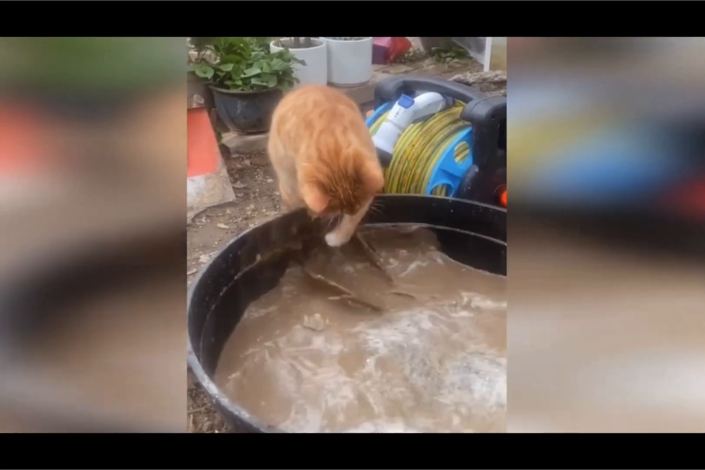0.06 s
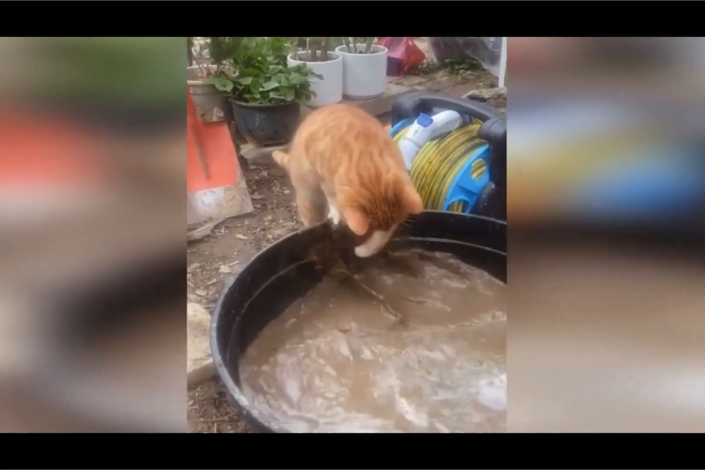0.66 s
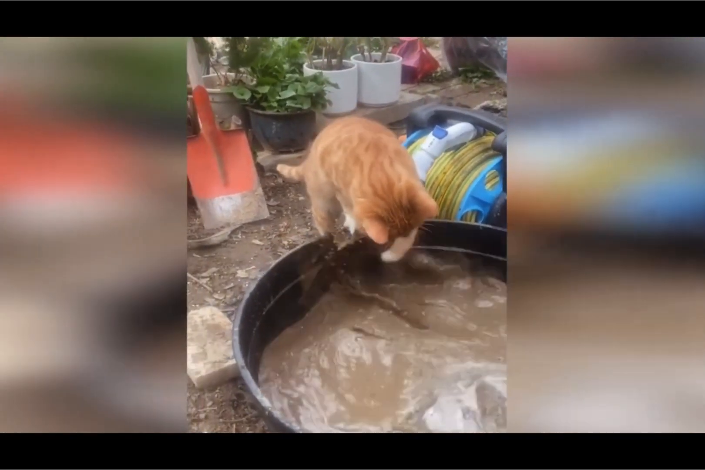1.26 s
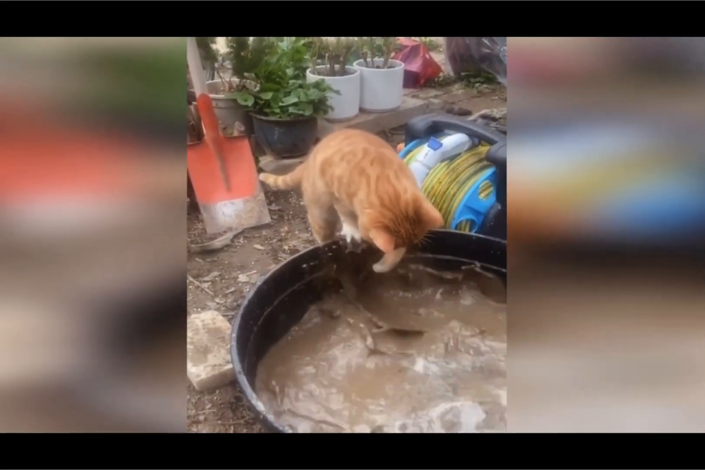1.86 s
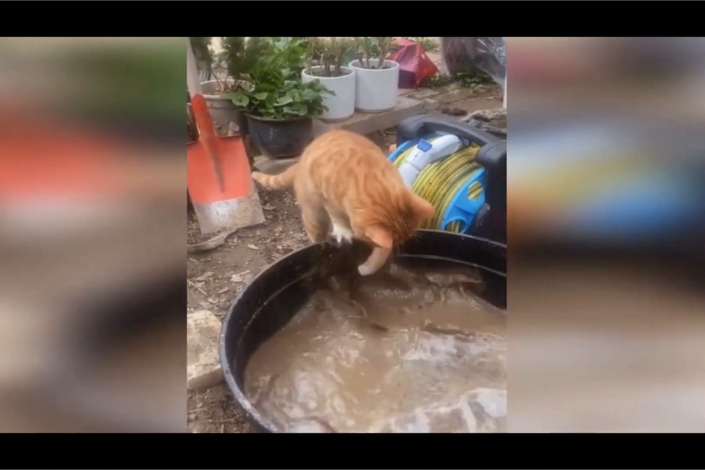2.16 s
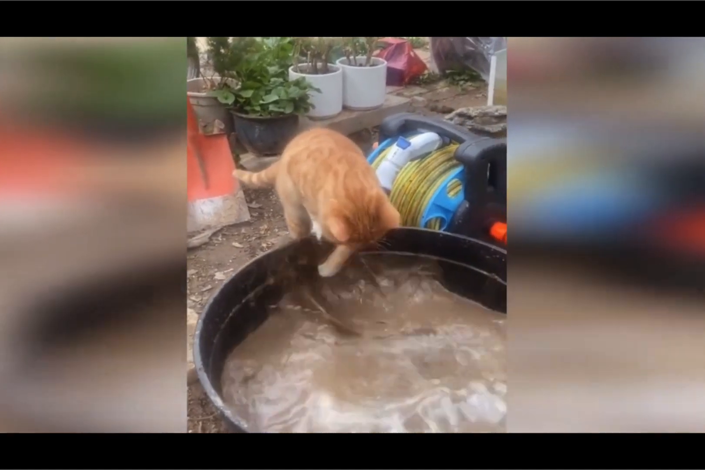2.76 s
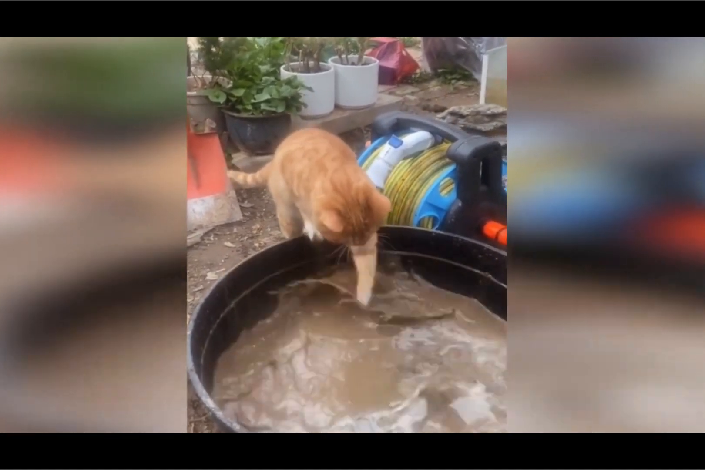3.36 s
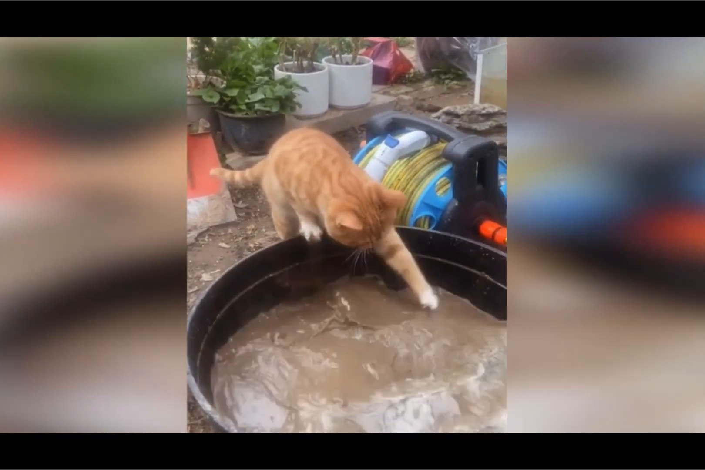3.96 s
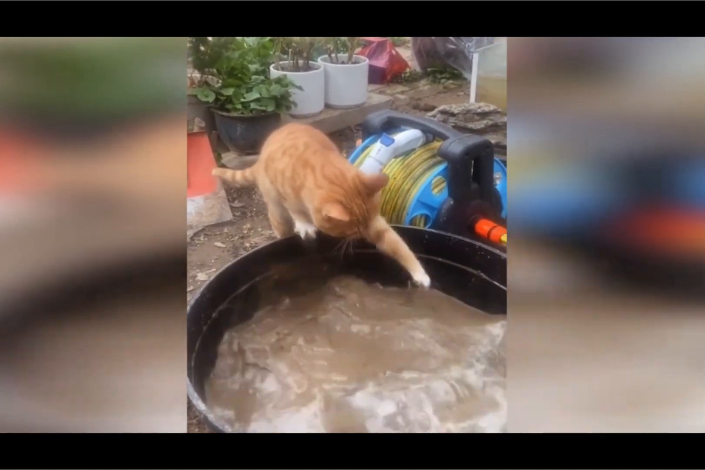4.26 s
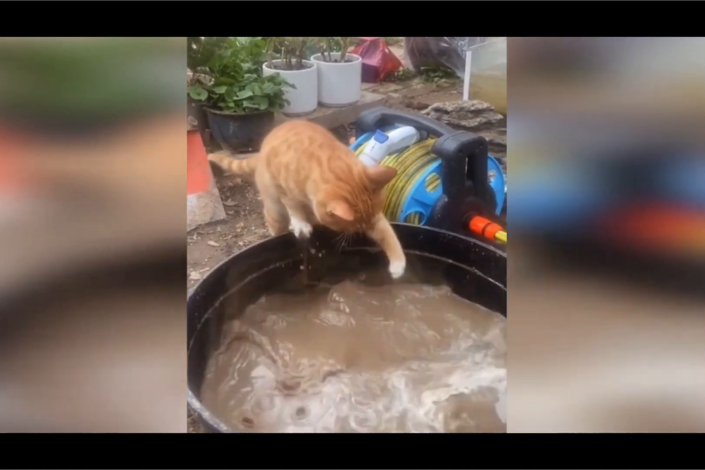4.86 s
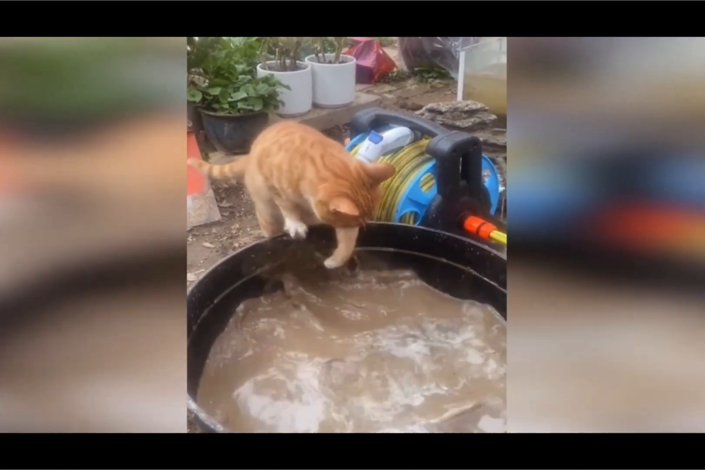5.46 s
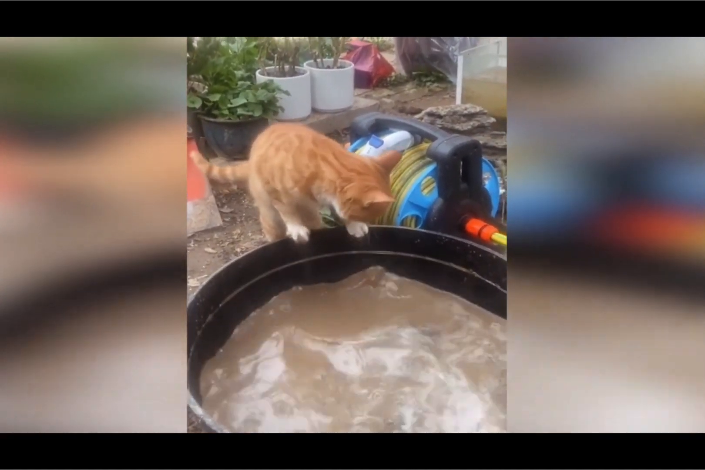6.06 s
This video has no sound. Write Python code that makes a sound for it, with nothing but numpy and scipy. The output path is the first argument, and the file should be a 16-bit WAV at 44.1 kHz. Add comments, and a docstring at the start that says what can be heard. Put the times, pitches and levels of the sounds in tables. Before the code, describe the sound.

A cat paws at water in a plastic tub outdoors, close to a stereo microphone. From the start until about 3.2 seconds the strokes come roughly three a second, uneven in strength, with sharp ones near 0.3 and 2.7 seconds. Each is a soft swish swelling into a short splash, closed by a plop and a hollow gulp. Between them drops tick back and small bubbles plink. Lighter dips and drips follow until about 4 seconds, then fuller splashes return at 4.3, 4.6 and 5 seconds. The tub gives soft low thuds near 3.7, 4.3 and 4.9 seconds, the last the strongest. After a light splash at 5.3 seconds the water settles until the end at 6 seconds. A quiet low rumble and faint open-air hiss run throughout, with barely audible soft distant tones around 1.3 and 4.5 to 4.8 seconds.

```python
"""A cat paws at the water in a plastic tub, about three strokes a second, close to a stereo microphone.
The paw dips in with a soft swish, then pulls through: churn and spray swell, the hollow behind it
closes with a plop and the tub gulps. Between strokes drops tick back and bubbles plink.
The tub gives a few soft low thuds. It stands outdoors, in a low rumble and faint hiss,
with a few soft tones far away."""
import sys
import numpy as np
from scipy import signal
from scipy.fft import rfft, irfft, next_fast_len
from scipy.io import wavfile
from scipy.ndimage import map_coordinates

SR = 44100
rng = np.random.default_rng(int(sys.argv[2]) if len(sys.argv) > 2 else 0)


def bounce(signal):
    """Save signal as a 16-bit WAV file at the path given by the first command-line argument."""
    frames = np.transpose(np.atleast_2d(signal))
    limited = np.clip(frames, -1, 1)
    pcm = np.round(limited * 32767).astype(np.int16)
    wavfile.write(sys.argv[1], SR, pcm)


N = 269054

# paw strokes, timed where the hollow closes; a rise spans 60 dB:
# close_s, churn_db, spray_db, rise_s, pocket_hz, pocket_db, pocket_t60_s, gulp_db
PAW_STROKES = [(.2575, -32.3, -35.5, .075, 1570, -21, 0.012, -29.5),
               (.557, -39, -38.5, .067, 1500, -32, 0.043, -30),
               (.830, -36, -40.5, 0.08, 1600, -19, 0.0042, -27),
               (1.131, -35.5, -38, 0.12, 1880, -24.5, 0.0045, -27),
               (1.445, -36.5, -38, 0.1544, 1310, -26, .008, -36.5),
               (1.761, -42, -46, 0.17, 1294, -33.5, .008, -38),
               (2.072, -42, -46.5, 0.19, 1390, -29.5, 0.032, -35),
               (2.382, -39.5, -42.5, 0.1, 1776, -22.5, 0.0099, -43),
               (2.678, -34, -35.7, .03, 1295, -27.5, .035, -32),
               (3.011, -38, -39, 0.11, 1390, -19, 0.01, -31.5),
               (3.227, -46, -52, 0.2, 1608, -35, .012, -47),
               (4.040, -47.5, -47.5, 0.09, 1330, -46, .02, -48),
               (4.348, -41.5, -47, 0.14, 2060, -38, .022, -32.5),
               (4.640, -35.5, -38.5, .11, 1474, -25.5, .022, -34.5),
               (4.983, -40.5, -42.5, .11, 2330, -24.5, 0.0024, -38.5),
               (5.337, -47, -45.5, .11, 1386, -48, .02, -53)]
# light dips and lifts of the paw; a fall spans 60 dB: peak_s, churn_db, spray_db, fall_s
PAW_DIPS = [(.178, -49.5, -50, 0.45), (0.485, -51.5, -48, 0.27), (.772, -60, -49.5, 0.4),
            (1.067, -56, -49, 0.03), (1.37, -53, -49, 0.22), (1.558, -52.5, -54.5, 0.18),
            (1.643, -55.5, -55, 0.48), (1.711, -51.5, -49.5, 0.42), (2.005, -62, -49.5, 0.06),
            (2.317, -53, -50, 0.14), (2.351, -53.5, -51.5, 0.38), (2.615, -51, -44.5, .16),
            (2.656, -50, -45.5, .27), (2.915, -49, -46.5, 0.18), (3.113, -59, -55, 0.3),
            (3.246, -47.5, -46, 0.06), (3.33, -59.5, -54.5, 0.22), (3.391, -55, -55.5, 0.18),
            (3.59, -53.5, -50, 0.1), (3.652, -56, -51.5, .23), (3.721, -51, -55.5, 0.13),
            (3.905, -51.5, -50.5, .27), (3.985, -56, -48.5, 0.3), (4.151, -51, -51.5, .05),
            (4.273, -53.5, -47.5, 0.08), (4.314, -48, -43, 0.13), (4.548, -61.5, -50.5, 0.52),
            (4.872, -49, -54.5, 0.12), (4.914, -51, -44, 0.08), (5.272, -65, -57, 0.2),
            (5.361, -52, -54, 0.2)]
# restless water between strokes, settling at the end: time_s, churn_db, spray_db
RESTLESS_WATER = [(0, -62, -62.5), (.25, -80, -75), (.5, -67.5, -64), (1.0, -71, -69), (1.5, -69.5, -70),
                  (2.0, -68, -63), (2.3, -70, -72.5), (2.75, -73.5, -70), (3.5, -67.5, -64.5),
                  (3.75, -71, -63), (4.0, -83, -78), (4.25, -64, -64.5), (4.5, -72, -72),
                  (5.0, -70.5, -64.5), (5.25, -84, -76.5), (5.5, -73.5, -74), (5.75, -88, -83),
                  (6.03, -79, -90)]
# notes of the tub's gulp under every stroke: pitch_hz, relative_db, t60_s
GULP_NOTES = [(335, -18, .035), (512, -14, 0.024), (724, -1.5, 0.027), (1060, -9.5, 0.025)]
# the clearest single bubbles: start_s, pitch_hz, relative_db, t60_s
CLEAR_BUBBLES = [(.042, 3890, -35.5, .019), (.09, 4120, -42, .018), (.171, 706, -38.5, .017),
                 (.186, 2820, -41, .023), (.262, 1060, -28, .019), (.403, 2138, -54, .033),
                 (.471, 640, -38, 0.016), (.671, 2253, -50.5, .033), (.7, 2189, -49, .02),
                 (.712, 2130, -44, 0.015), (.769, 2960, -41.5, .022), (.984, 4070, -48, 0.023),
                 (1.139, 2280, -29.5, .028), (1.436, 1890, -32, .005), (1.643, 1236, -33.5, 0.034),
                 (1.713, 3000, -36, .003), (1.755, 1750, -33, 0.02), (1.871, 3630, -41.5, .009),
                 (1.998, 3400, -40.5, .025), (2.005, 2850, -35, 0.015), (2.125, 980, -50.5, 0.045),
                 (2.445, 1960, -40, 0.034), (2.679, 2950, -23.5, 0.018), (2.6804, 2020, -27, .022),
                 (2.959, 1207, -42, .037), (3.110, 3030, -33, 0.027), (3.141, 2065, -45, 0.016),
                 (3.2205, 667, -35.5, 0.013), (3.221, 1090, -40.5, 0.017), (3.229, 2180, -34, 0.031),
                 (3.319, 825, -46, 0.033), (3.392, 730, -43.5, 0.014), (3.553, 650, -37.5, 0.023),
                 (3.703, 1798, -43, .039), (3.722, 1470, -40, 0.024), (3.775, 290, -53.5, .045),
                 (3.895, 715, -46, .026), (3.925, 3420, -35.5, .023), (4.031, 1350, -35, 0.019),
                 (4.151, 1510, -40.5, 0.042), (4.224, 677, -47, .029), (4.204, 1820, -30, 0.013),
                 (4.274, 2240, -38, .029), (4.974, 3660, -33, 0.017), (5.325, 1386, -44, 0.02),
                 (5.361, 2060, -29, .0055), (5.465, 2870, -60.5, .014)]
# the clearest drops hitting the surface: start_s, relative_db, brightness_hz
CLEAR_DROPS = [(.089, -48, 5900), (.461, -50, 6300), (.905, -55, 7100), (1.069, -42.5, 6300),
               (1.239, -47, 5560), (1.373, -44, 6700), (2.080, -41.5, 5950), (2.314, -40.5, 5000),
               (2.583, -46, 4600), (2.614, -36.5, 5600), (2.906, -39.5, 5560), (2.918, -38, 5750),
               (2.964, -44, 8300), (3.319, -45, 5000), (3.393, -46.5, 6200), (3.455, -39, 5460),
               (3.723, -46, 6300), (3.876, -53.5, 6900), (4.204, -41.5, 4100), (4.3495, -38.5, 5750),
               (4.756, -46, 6900), (4.881, -36.5, 5400), (5.264, -45.5, 6240), (5.3414, -39.5, 10500),
               (5.55, -58, 6700)]
# colours of the churn, the spray and a closing air pocket: frequency_hz, relative_db
CHURN_SPECTRUM = [(150, -33.5), (250, -18.5), (335, 2), (450, -4.5), (560, 0), (730, 1), (1000, -6),
                  (1500, -3), (2300, -2.5), (3100, -2), (4000, -5.5), (4800, -14.5), (6500, -29.5)]
SPRAY_SPECTRUM = [(2200, -18), (3700, -2.5), (4700, -6.5), (5400, 1), (6800, -2), (8300, -4.5), (12000, -4),
                  (14500, -7.5), (16000, -15.5)]
SMACK_SPECTRUM = [(150, -30.5), (250, -12), (340, 6), (480, 0.5), (800, 0), (2000, -2.5), (3500, -9),
                  (6000, -16.5), (12000, -30)]
# ring of the tub and yard: frequency_hz, t60_s
TUB_DECAY = [(300, 0.08), (800, 0.049), (2000, 0.09), (6000, 0.037), (14000, 0.031)]
# how alike the splashing is left and right: frequency_hz, likeness (1 or more is mono)
WATER_LIKENESS = [(300, 1.5), (700, 0.4), (1200, 1.03), (2500, 0.42), (4500, -.05), (9000, 0), (14000, .35)]
# the water's balance at the microphone: frequency_hz, left_minus_right_db
WATER_BALANCE = [(60, 0.0), (110, 0.5), (200, -2), (380, 2.5), (700, 5), (1290, 1.5), (2380, 1.5),
                 (4400, -0.5), (8120, 0.0), (15000, 0.0)]
# soft low thuds of the tub: peak_s, upper_gain_db
TUB_THUDS = [(3.71, 4), (4.31, 6), (4.885, 16), (4.985, 8)]
# outdoor rumble in two bands: time_s, deep_db, upper_db
RUMBLE_LEVELS = [(0, -58, -61.5), (2.9, -59.5, -63), (4.3, -58.5, -60), (5.0, -58.5, -61.5),
                 (5.45, -67.5, -66), (5.8, -60.5, -68.5), (6.1, -60, -64.5)]
# colours of the two low bands and the open-air hiss: frequency_hz, relative_db
DEEP_SPECTRUM = [(20, -28), (33, -18), (46, -2.5), (58, 1.5), (80, -3), (110, -14), (200, -49)]
UPPER_SPECTRUM = [(60, -19), (95, 0), (125, 1), (170, -8.5), (260, -13), (400, -23), (800, -44)]
AIR_SPECTRUM = [(150, -6), (350, -0.5), (750, 2.5), (1100, -8), (2700, -19.5), (5000, -31), (8000, -33.5),
                (12000, -29.5), (16000, -33)]
# faint tones in the distance: middle_s, length_s, pitch_hz, level_db
DISTANT_TONES = [(1.25, .24, 601, -66.5), (1.377, 0.13, 632, -64), (4.509, 0.11, 394, -63.5),
                 (4.77, 0.27, 410, -70)]


def splashing(calm_db=-54, froth_db=-.5, beads_db=-10, spray_db=-.33, crackle_db=-10):
    """The paw tears the water unevenly into coarse churn and fine spray: tiny bubbles and noise."""
    power = paw_power()
    tearing = amp(.53 * wobble(110) + .7 * wobble(40))
    churn_gain, spray_gain = np.sqrt(power) * tearing
    froth = bubble_cloud(596.4, 4840, cycles=15, spread_db=4, glide=.067, count=6000, samples=500)
    beads = bubble_cloud(1406, 4790, cycles=95, spread_db=5, glide=.12, count=220, samples=1300)
    fizz = bubble_cloud(2996, 14480, cycles=30, spread_db=5, glide=.064, count=4500, samples=400)
    # in calm water single bubbles stand out; in a hard stroke they merge into froth
    calm = 1 / np.hypot(1, churn_gain / amp(calm_db))
    churn = amp(froth_db) * stereo(froth + 1.17 * rng.standard_normal((2, N)), CHURN_SPECTRUM)
    churn += amp(beads_db) * calm * stereo(beads, CHURN_SPECTRUM)
    spray = amp(spray_db) * stereo(fizz + 1.4 * rng.standard_normal((2, N)), SPRAY_SPECTRUM)
    # light splashes break up into separate crackling droplets
    crackle = bubble_cloud(2800, 8500, cycles=24, spread_db=6, glide=.1, count=520, samples=400)
    spray += amp(crackle_db) * calm * stereo(crackle, SPRAY_SPECTRUM)
    return churn_gain * churn + spray_gain * spray


def paw_power(crest_s=.0056, collapse_s=.082, dip_rise_s=.11, pre_hit_db=-2.5, lead_s=.0041, hard_db=-44):
    """Each stroke and dip swells and collapses over the restless water: power of churn and of spray."""
    t = np.arange(N) / SR
    power = amp(curves(RESTLESS_WATER)) ** 2
    moves = [(s + crest_s, churn, spray, rise, collapse_s) for s, churn, spray, rise, *_ in PAW_STROKES]
    moves += [(s, churn, spray, dip_rise_s, fall) for s, churn, spray, fall in PAW_DIPS]
    for peak_s, churn_db, spray_db, rise_s, fall_s in moves:
        near = slice(max(int((peak_s - .3) * SR), 0), int((peak_s + .4) * SR))
        swell_db = -60 * np.maximum((peak_s - t[near]) / rise_s, (t[near] - peak_s) / fall_s)
        # a short hiss fades in before each hard splash; the body comes at the hit
        held_db = pre_hit_db * (t[near] < peak_s - lead_s) / np.hypot(1, amp(hard_db - churn_db))
        power[:, near] += amp([churn_db + swell_db + held_db, spray_db + swell_db]) ** 2
    return power


def bubble_cloud(low_hz, high_hz, cycles, spread_db, glide, count, samples):
    """Tiny bubbles ring and rise in pitch, each from its own direction: middle and side of rms 1."""
    when, pitch, strength, angle = rng.random((count, 4)).T[..., None]
    hz = low_hz * (min(high_hz, SR / 2) / low_hz) ** pitch
    turns = hz * np.arange(samples) / SR
    gain = amp(-spread_db * np.log(1 - .95 * strength)) * hz
    envelope = amp(-60 * turns / cycles) * (1 - np.exp(-turns / 2))
    ring = gain * envelope * np.sin(2 * np.pi * turns * (1 + glide * turns / cycles / 2))
    at = ((when * N).astype(int) + np.arange(samples)).ravel()
    mid_side = (1, np.cos(2 * np.pi * angle))
    return np.array([unit(np.bincount(at, (ring * pickup).ravel(), N)[:N]) for pickup in mid_side])


def bubbles(glide=.16, ring_db=-.5, smack_db=-6.5, smack_t60_s=.023, big_db=-32):
    """Trapped air rings at the pitch of its size and rises; big pockets close with a broad smack."""
    out, t = np.zeros((2, N)), np.arange(SR // 20) / SR
    for start_s, hz, db, t60 in [*pockets_and_gulps(), *CLEAR_BUBBLES, *stray_bubbles()]:
        turns = hz * t * (1 + glide * (t / t60 / 2 - .15))
        envelope = (1 - np.exp(-(hz * t) ** 2)) * amp(-60 * t / t60)
        ring = amp(ring_db) * envelope / envelope.max() * np.sin(2 * np.pi * turns)
        bulk = np.sqrt(min(t60 / smack_t60_s, 1)) / np.hypot(1, amp(big_db - db))  # loud, long: much air
        # small pockets give no low thud
        colour = lambda f: amp(along(SMACK_SPECTRUM, f)) * f ** 2 / (f ** 2 + (.29 * hz) ** 2)
        smack = unit(filtered(rng.standard_normal(len(t)), colour))
        smack *= bulk * amp(smack_db - 60 * t / smack_t60_s) * (1 - np.exp(-t / .00026))
        add(out, start_s, amp(db) * in_tub(ring + smack, wall_db=-15, apart_hz=1000))
    return out


def pockets_and_gulps(scatter=.05):
    """Every stroke traps a pocket of air and makes the tub gulp: rows like CLEAR_BUBBLES."""
    rows = []
    for close_s, *_, pocket_hz, pocket_db, pocket_t60_s, gulp_db in PAW_STROKES:
        tuning = 1 + scatter * rng.uniform(-.8, 1)
        rows.append((close_s, pocket_hz, pocket_db, pocket_t60_s))
        rows += [(close_s, hz * tuning, gulp_db + db, t60) for hz, db, t60 in GULP_NOTES]
    return rows


def stray_bubbles(play_s=4.7, low_hz=1800, faint_db=-59, range_db=8, t60_s=.026, count=24):
    """Small bubbles plink at random, within an octave, while the cat plays: rows like CLEAR_BUBBLES."""
    return [(play_s * (k + when) / count, low_hz * 2 ** pitch, faint_db + range_db * strength, t60_s)
            for k, (when, pitch, strength) in enumerate(rng.random((count, 3)))]


def drops(t60_s=.016, attack_s=.0011, width_octaves=.52, gain_db=9):
    """A falling drop gives a short bright tick, somewhere across the tub."""
    out, t = np.zeros((2, N)), np.arange(SR // 50) / SR
    for start_s, db, brightness_hz in [*CLEAR_DROPS, *stray_drops()]:
        band = lambda hz: 1 / (1 + (np.log2((hz + 1) / brightness_hz) / width_octaves) ** 2)
        tick = unit(filtered(rng.standard_normal(len(t)), band))
        tick *= amp(-60 * t / t60_s) * (1 - np.exp(-t / attack_s))
        pan = amp(rng.normal(0, 1.4) * np.array([[1], [-1]]))
        add(out, start_s, amp(db + gain_db) * pan * in_tub(tick, wall_db=-8.5, apart_hz=1200))
    return out


def stray_drops(play_s=4.7, centre_hz=6600, faint_db=-60, range_db=8, octaves=.8, count=20):
    """Thrown water falls back at random while the cat plays: rows like CLEAR_DROPS."""
    return [(play_s * (k + when) / count, faint_db + range_db * strength,
             centre_hz * 2 ** (octaves * (pitch - .5)))
            for k, (when, strength, pitch) in enumerate(rng.random((count, 3)))]


def in_tub(sound, wall_db, apart_hz):
    """The direct sound and a fresh scatter off the tub wall; above apart_hz each side gets its own."""
    hz, t, noise = signal.stft(rng.standard_normal((2, SR // 8)), SR, nperseg=128)
    noise[1] *= (hz / np.hypot(hz, apart_hz))[:, None]
    decay = amp(-60 * t / along(TUB_DECAY, hz)[:, None])
    mid, side = signal.istft(noise * decay, SR, nperseg=128)[1]
    response = amp(wall_db) * np.array([mid + side, mid - side]) / np.linalg.norm(mid)
    response[:, 0] += 1  # direct path
    return signal.fftconvolve(sound[None], response, axes=1)


def thuds_and_outdoors(waver_db=1, thud_s=.036, deep_share=.69, hiss_db=-73.5):
    """Soft thuds of the tub and a wavering outdoor rumble share two low noise bands, under faint hiss."""
    t = np.arange(N) / SR
    deep_db, upper_db = curves(RUMBLE_LEVELS) + waver_db * wobble(9)
    thud_db = sum(db * np.exp(-((t - peak_s) / thud_s) ** 2) for peak_s, db in TUB_THUDS)
    likeness = [(60, 1), (130, .99), (400, .51), (4000, .2)]
    noise = lambda spectrum: stereo(rng.standard_normal((2, N)), spectrum, likeness)
    deep = amp(deep_db + deep_share * thud_db) * noise(DEEP_SPECTRUM)
    upper = amp(upper_db + thud_db) * noise(UPPER_SPECTRUM)
    return deep + upper + amp(hiss_db) * noise(AIR_SPECTRUM)


def far_tones():
    """Something far from the microphone gives a few faint, soft-edged tones."""
    out = np.zeros(N)
    for middle_s, length_s, hz, db in DISTANT_TONES:
        t = np.arange(int(length_s * SR)) / SR
        envelope = amp(db) * np.sin(np.pi * t / length_s)
        add(out, middle_s - length_s / 2, envelope * np.sin(2 * np.pi * hz * t))
    return out


def amp(db):
    """Decibels to gain."""
    return 10 ** (np.asarray(db) / 20)


def unit(x):
    """Scale to rms 1."""
    return x / np.sqrt(np.mean(x ** 2) + 1e-20)


def along(points, hz):
    """Join (frequency_hz, value) points on a log axis."""
    knots_hz, values = np.transpose(points)
    return np.interp(np.log(hz + 1), np.log(knots_hz + 1), values)


def curves(rows):
    """One value per sample for each column after the time."""
    time_s, *columns = np.transpose(rows)
    return np.array([np.interp(np.arange(N) / SR, time_s, column) for column in columns])


def filtered(x, response):
    """Filter x by a function of frequency."""
    n = x.shape[-1]
    padded = next_fast_len(n + 4096)
    return irfft(rfft(x, padded) * response(np.fft.rfftfreq(padded, 1 / SR)), padded)[..., :n]


def add(track, start_s, sound):
    """Mix a sound into a track."""
    part = track[..., max(round(start_s * SR), 0):][..., :sound.shape[-1]]
    part += sound[..., :part.shape[-1]]


def wobble(rate):
    """A smooth random curve, rate knots a second."""
    return map_coordinates(rng.standard_normal(int(N * rate / SR) + 4), [np.arange(N) * rate / SR])


def stereo(pair, spectrum, likeness=WATER_LIKENESS):
    """Two unrelated signals to a coloured left and right whose middle has rms 1."""
    angle = lambda hz: np.arccos(np.clip(along(likeness, hz), -1, 1)) / 2
    response = lambda hz: amp(along(spectrum, hz)) * np.array([np.cos(angle(hz)), np.sin(angle(hz))])
    mid, side = filtered(pair, response)
    return np.array([mid + side, mid - side]) / np.std(mid)


def scene(lag_s=.00005):
    """The tub in front, its midrange a little stronger and sooner on the left; the outdoors behind."""
    water = splashing() + bubbles() + drops()
    sides = np.array([[.5], [-.5]])
    balance = lambda hz: amp(along(WATER_BALANCE, hz) * sides)
    arrival = lambda hz: np.exp(2j * np.pi * hz * lag_s * sides / (1 + (hz / 4000) ** 2))
    return filtered(water, lambda hz: balance(hz) * arrival(hz)) + thuds_and_outdoors() + far_tones()


def record(dry, top_hz=15950):
    """The recorder keeps nothing above its band limit."""
    return filtered(dry, lambda hz: 1 / np.sqrt(1 + (hz / top_hz) ** 200))


dry = scene()
out = record(dry)
bounce(out)
```